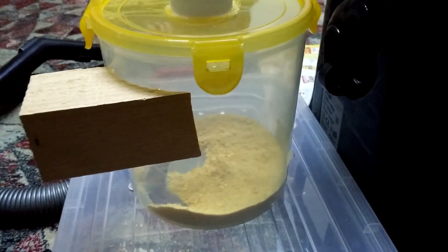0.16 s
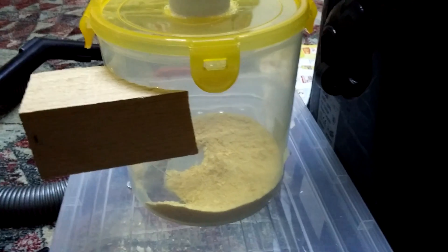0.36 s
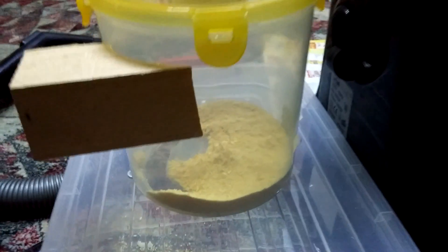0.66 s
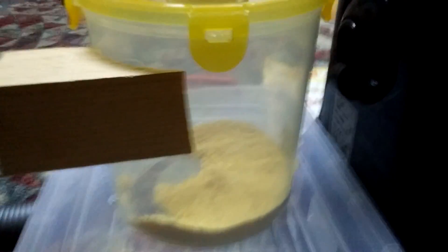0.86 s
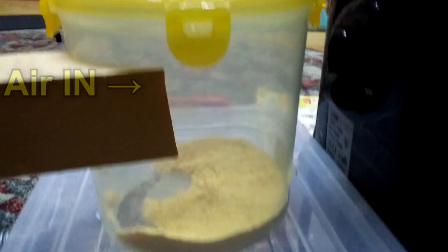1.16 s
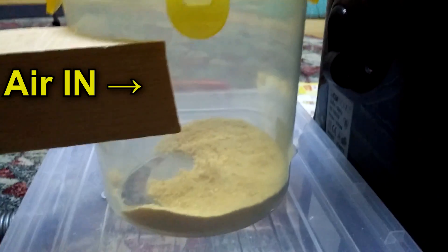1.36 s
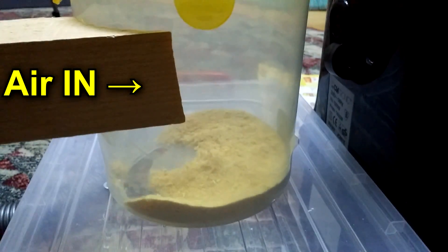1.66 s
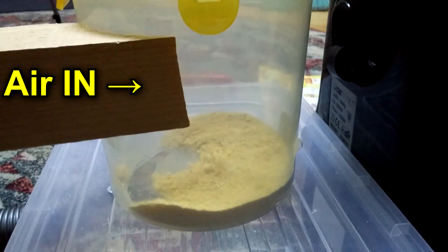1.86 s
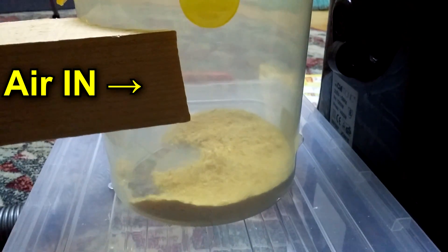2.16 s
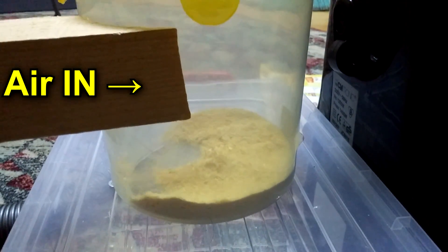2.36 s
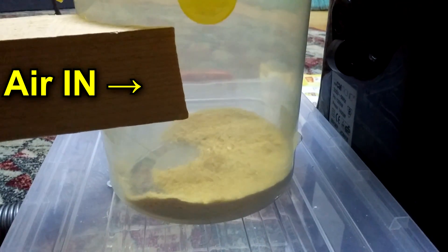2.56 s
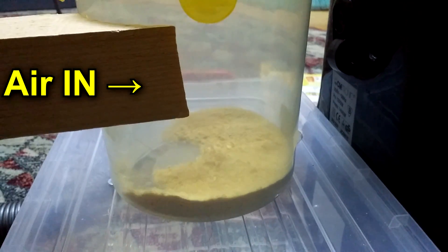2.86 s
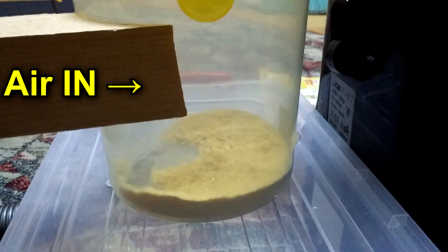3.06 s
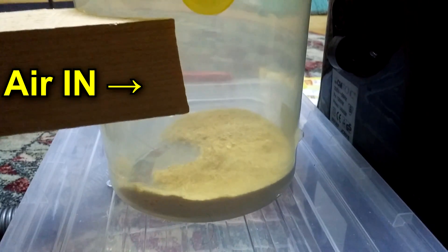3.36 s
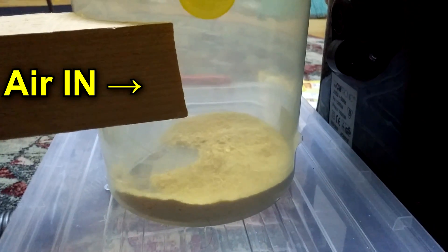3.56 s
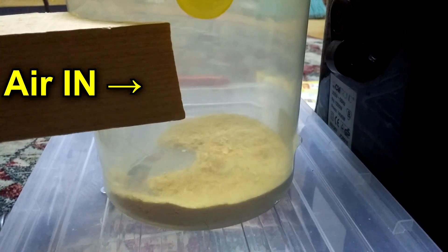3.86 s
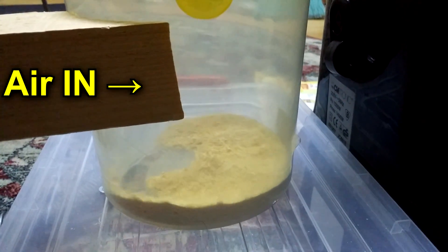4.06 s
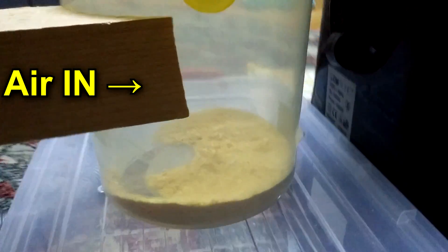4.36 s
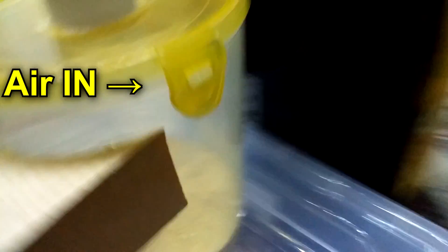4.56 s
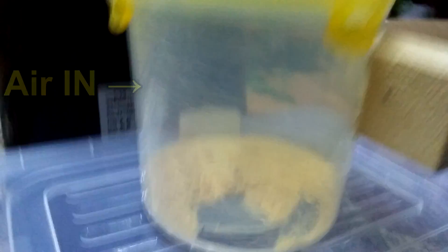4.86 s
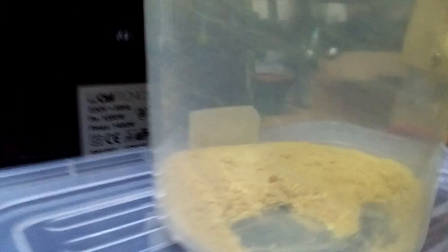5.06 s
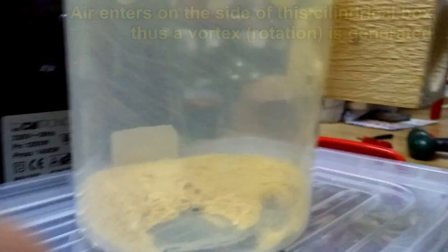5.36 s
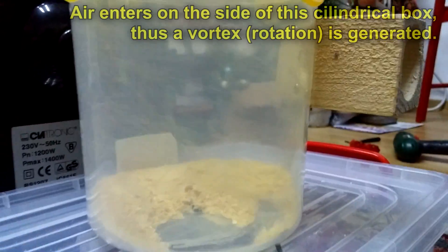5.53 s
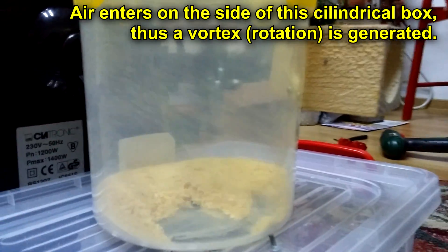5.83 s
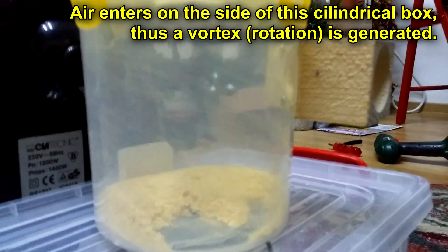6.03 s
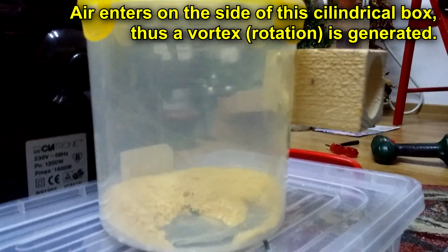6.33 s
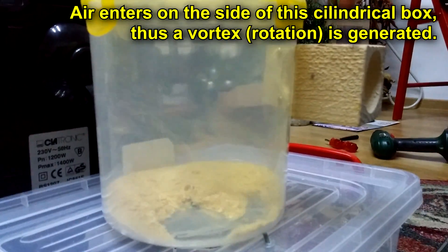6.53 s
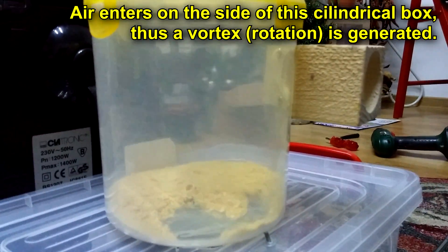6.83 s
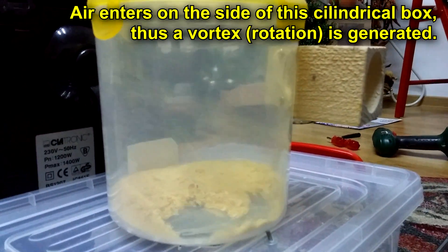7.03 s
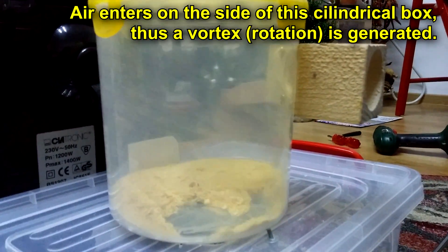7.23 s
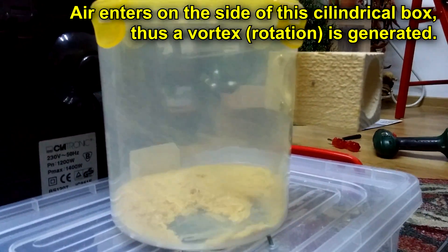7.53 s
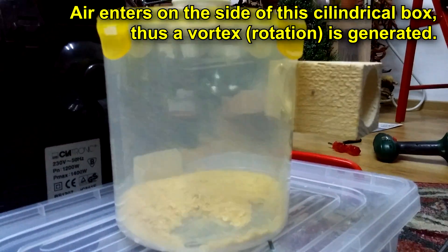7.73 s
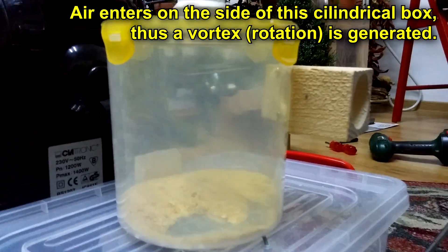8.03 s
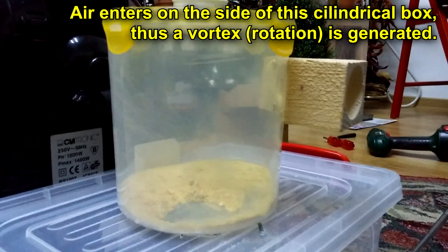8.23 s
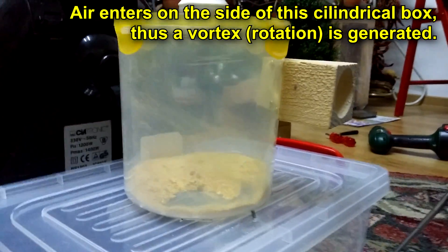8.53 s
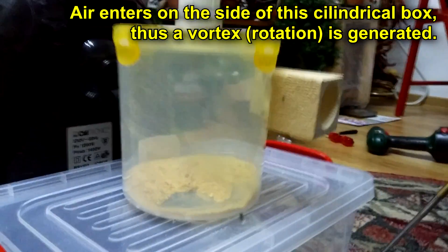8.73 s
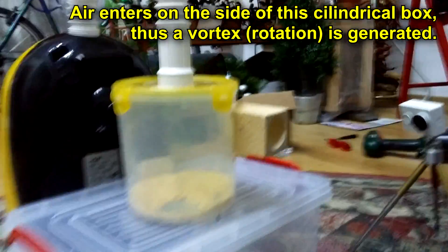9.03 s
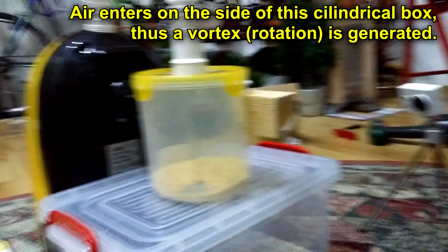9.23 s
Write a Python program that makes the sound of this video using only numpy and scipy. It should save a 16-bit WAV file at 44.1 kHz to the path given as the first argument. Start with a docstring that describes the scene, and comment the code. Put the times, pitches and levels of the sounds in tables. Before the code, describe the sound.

A rough mains buzz with two small chip ticks starts a vacuum cleaner motor, whose whine climbs quickly while air rushes loudly into a plastic jar. The close handheld microphone hears bright, hissing suction for several seconds, then swings round behind the jar with a soft bump. The rush falls away, leaving duller exhaust, motor drone and a thin whine, getting quieter towards the end.

```python
"""A rough mains buzz and two ticks of wood chips lead into a vacuum cleaner spinning up on a plastic cyclone jar.
One shaft drives the sine tones: drone, nine-blade fan whine and ball-bearing song, beside a mains hum.
Filtered noise makes the inlet rush, exhaust, brush sparks and the hiss of a leaking lid.
A hand-held camera starts beside the hissing inlet, then moves round behind the jar, where the duller
exhaust and the motor tones are left; the hand bumps and rubs its body."""
import sys
import numpy as np
from scipy import signal
from scipy.fft import rfft, irfft
from scipy.io import wavfile
from scipy.ndimage import uniform_filter1d, minimum_filter1d, map_coordinates

SR = 44100
rng = np.random.default_rng(int(sys.argv[2]) if len(sys.argv) > 2 else 0)


def generate_wav(sig):
    """Save sig (samples, or channels by samples) to the path in sys.argv[1] as 16-bit PCM at SR."""
    pcm = np.round(np.clip(np.atleast_2d(sig).T, -1, 1) * 32767).astype(np.int16)
    wavfile.write(sys.argv[1], SR, pcm)


N = 414099
TIME = np.arange(N) / SR
FREQ = np.arange(N // 2 + 1) * SR / N
HUM_HZ = 100.05  # magnetic pull peaks twice in each mains cycle

# The camera's path. Each row: time in seconds, place from 0 (in front of the inlet) to 1 (behind the jar),
# level change with distance in dB.
CAMERA = [(0, 0.25, 0.5), (4.6, 0.24, 1.5), (5.1, 0.83, 3), (6.15, 1, 1.1), (6.9, 0.87, 0), (7.5, 0.87, -2),
          (8.87, 0.77, -3.5), (8.94, 0.84, -6.5), (9.38, 0.74, -7)]
# Room modes and nulls that the rising tones sweep through. Each row: centre in Hz, half width in Hz,
# left and right boost in dB.
ROOM = [(114, 15, -9, -13), (158, 4, -3, -5), (169, 37, 3, 7), (187, 5, 0, 0), (207, 4, -5, -3),
        (227, 12, 3, 7), (242, 5.4, -6.5, -6), (260, 3.5, -16.5, -9), (274.4, 4.5, -12, 0.5),
        (505, 15, -8, -10), (565, 29, 3, 3.5), (775, 26, 7.5, 6), (864, 8.9, 6.5, 6), (1930, 10, -5, -10),
        (2150, 22, -5, 1), (2175, 6.7, -18, -19), (2385, 6.4, 2, -8)]


def amp(db):
    """Logarithmic level: 20 dB is a tenfold amplitude."""
    return 10 ** (np.asarray(db) / 20)


def curve(table):
    """Linear interpolation: the columns of a table of times, joined by straight lines."""
    s, *columns = np.transpose(table)
    return np.array([np.interp(TIME, s, c) for c in columns])


def humps(x, table):
    """Resonance: left and right dB of bell-shaped peaks and nulls along pitch or time."""
    return sum(np.outer(heights, np.exp(-((x - centre) / width) ** 2)) for centre, width, *heights in table)


def swells(table):
    """Gaussian envelopes: smooth rises and falls, each with its time, level and half width."""
    return sum(amp(db) * np.exp(-((TIME - s) / width) ** 2) for s, db, width in table)


def bursts(table, rise_s):
    """Exponential decay: quick starts that die away."""
    envelope = 0
    for s, db, decay in table:
        rise = np.clip((TIME - s) / rise_s + .5, 0, 1)
        envelope = envelope + amp(db) * rise * np.exp(-np.abs(TIME - s) / decay)
    return envelope


def walk(rate):
    """Slow random fluctuation: levels held 1 / rate s, smoothed twice, of unit deviation."""
    k = int(SR / rate)
    held = np.repeat(rng.standard_normal(N // k + 1), k)
    slow = uniform_filter1d(uniform_filter1d(held, k), k)[:N]
    return slow / slow.std()


def band(x, low_hz, high_hz):
    """Gentle band-pass filtering."""
    return signal.sosfilt(signal.butter(2, [low_hz, high_hz], "band", fs=SR, output="sos"), x)


def spectrum(table, peaks=()):
    """Spectral density: left and right gains that give white noise a spectrum with resonances on it."""
    hz, *sides = np.transpose(table)
    db = np.array([np.interp(np.log(FREQ + 1), np.log(hz), side) for side in sides])
    db = db + humps(FREQ, peaks)
    low_cut = FREQ / np.hypot(FREQ, 30)
    return amp(db) * np.sqrt(SR / 2) * low_cut


def ports(source, gains, lag_ms, alike_hz):
    """Spatial coherence: two microphones share a delayed noise in the bass, diffuse above alike_hz."""
    direct = 1 / (1 + (FREQ / alike_hz) ** 2)
    delay = np.exp(-1j * np.pi * np.outer([1, -1], FREQ) * lag_ms / 1000)  # half the lag on each side
    diffuse = rfft(rng.standard_normal((2, N)))
    return irfft(gains * (np.sqrt(direct) * delay * rfft(source) + np.sqrt(1 - direct) * diffuse), N)


def shaft_speed():
    """Exponential approach: turns per second near the top after a quick kick and slow climb, then sag."""
    top_hz, sag_hz_per_s = 297.5, .65
    kick_hz, kick_s, climb_hz, climb_s = 38.8, .1563, 146.25, .8245
    return top_hz - kick_hz * np.exp(-TIME / kick_s) - climb_hz * np.exp(-TIME / climb_s) - sag_hz_per_s * TIME


def spin(speed, power):
    """Unbalance: rotating parts shake harder the faster they turn."""
    return (speed / speed.max()) ** power


def inrush():
    """Starting current: it holds, then dies away as the motor gathers speed."""
    start_db, hold_s, fall_db_per_s = -1.5, 0.31, 23
    return amp(start_db - fall_db_per_s * np.maximum(TIME - hold_s, 0))


def brushes(depth, lopsided, regular):
    """Amplitude modulation: the starting current sparks and rattles on each mains half wave, unequally."""
    # Density of the sparks. Each row: frequency in Hz, relative left and right density in dB.
    spark_density = [(59.7, -40, -66), (302, -72, -71), (800, -53.5, -52.5), (1490, -55.5, -60),
                     (2090, -49, -79.5), (3200, -58.5, -65), (4230, -66.5, -66), (7000, -90, -73),
                     (11900, -79, -79), (15600, -91, -90)]
    rattle = np.resize(rng.standard_normal(round(SR / HUM_HZ)), N)  # one half wave, repeated
    source = np.sqrt(regular) * rattle + np.sqrt(1 - regular) * rng.standard_normal(N)
    sparks = band(ports(source, spectrum(spark_density), lag_ms=0.17, alike_hz=3480), 220, 18000)
    mains = np.pi * HUM_HZ * TIME
    return sparks * (1 + depth * np.cos(2 * mains) + lopsided * np.cos(mains)) * inrush()


def motor(turns, speed, front_lag_ms, behind_lag_ms, waver_db, unbalance):
    """Forced vibration: shaft and magnetic pull give harmonics and sum tones, lagging between microphones."""
    # Unbalanced shaft along the path. Each row: time in seconds, left and right level in dB before the room.
    drone_path = [(1.2, -22.5, -26.5), (2.3, -26.5, -23), (2.8, -36.5, -29), (3.45, -25, -23),
                  (4.8, -24.5, -25), (5.2, -19, -20), (6.1, -21, -24.5), (7.1, -21, -24.5),
                  (7.7, -23.5, -30.5), (8.82, -27, -35.5), (9.03, -42, -37), (9.38, -36.5, -29.5)]
    # Magnetic hum. Each row: time in seconds, mean left and right level in dB.
    hum_path = [(0, -24.5, -28), (.6, -30.5, -33.5), (5.2, -32.5, -33.5), (6.3, -42, -40.5),
                (9.38, -48, -48.5)]
    # Third shaft order, ringing in the housing. Each row: time in seconds, relative left and right dB.
    third_order = [(1.4, -39, -37.5), (2.3, -37.5, -36), (3.5, -36, -34), (4.7, -42, -41),
                   (5.25, -31.5, -29.5), (6, -53, -52), (6.5, -47, -40.5), (7.9, -39.5, -38.5),
                   (8.15, -34.5, -32.5), (8.85, -31.5, -30.5), (9.15, -50, -36)]
    # Second shaft order along the path. Each row: time in seconds, relative level in dB.
    second_order = [(1.3, -40), (4.5, -43), (5.2, -51), (6.2, -53), (8.4, -53), (8.9, -49.5), (9.38, -47)]
    # Core buzz under the starting current. Each row: multiple of the hum, relative level in dB.
    core_buzz = [(2, -43), (3, -39.5), (4, -44), (8, -43), (12, -44)]
    # Sum tones. Each row: shaft multiple, hum multiple, relative dB in front, relative dB behind.
    motor_lines = [(0, 2, -36, -40.5), (0, 4, -56.5, -52.5), (0, 12, -43, -58), (1, 1, -40.5, -69),
                   (2, 1, -51.5, -53), (2, 2, -43, -62.5), (3, 1, -51, -50), (4, 0, -36, -59),
                   (8, 0, -60, -57)]

    behind, distance_db = curve(CAMERA)
    lag_ms = front_lag_ms + behind * (behind_lag_ms - front_lag_ms)
    lag = np.outer([-1, 1], lag_ms) / 2000  # seconds, half on each side
    shaft = 2 * np.pi * (turns + speed * lag)
    mains = 2 * np.pi * HUM_HZ * (TIME + lag)
    shake = spin(speed, unbalance)

    out = amp(curve(drone_path) + humps(speed, ROOM) + 0.83 * walk(15)) * np.sin(shaft)
    out += amp(curve(hum_path) + 0.4 * walk(25)) * np.sin(mains)
    out += amp(curve(third_order) + humps(3 * speed, ROOM) + 1.3 * walk(70)) * shake * np.sin(3 * shaft)
    out += amp(curve(second_order) + humps(2 * speed, ROOM) + 1.6 * walk(35)) * shake * np.sin(2 * shaft)
    out += inrush() * sum(amp(db + 2 * walk(8.9)) * np.sin(order * mains) for order, db in core_buzz)
    for shaft_order, hum_order, front_db, behind_db in motor_lines:
        gain = amp(distance_db + front_db + behind * (behind_db - front_db))
        if shaft_order:  # rotating parts rattle, the hum is steady
            hz = shaft_order * speed + hum_order * HUM_HZ
            gain = gain * amp(waver_db * walk(35) + humps(hz, ROOM)) * shake
        out += gain * np.sin(shaft_order * shaft + hum_order * mains)
    return np.sqrt(2) * out


def exhaust(gust_db):
    """Turbulence noise: duller air leaves through the filter; distance and the jar shade its treble more."""
    # Density of the exhaust air. Each row: frequency in Hz, relative left and right density in dB.
    exhaust_density = [(35, -78, -82), (100, -79, -78), (198, -61, -63), (587, -72, -77.5),
                       (906, -66.5, -67), (1370, -72.5, -73.5), (2640, -84, -67), (3150, -85, -86.5),
                       (4040, -89, -81.5), (6100, -80.5, -85.5), (7200, -94, -86.5), (10500, -93, -87.5),
                       (12500, -91, -102), (15500, -97, -112)]
    # Resonances. Each row: centre in Hz, half width in Hz, left and right boost in dB.
    exhaust_peaks = [(1110, 65, -6, -1.5), (1420, 75, -2.5, -4), (1790, 130, 0, 1.5), (2312, 69, -10, 9),
                     (4200, 330, 5, 1.5), (5960, 300, 0.5, 0.5), (9300, 850, 1, 5.5), (14600, 350, 6, 7)]
    behind, distance_db = curve(CAMERA)
    body_db = 2.5 + distance_db
    treble_db = 10 + 1.2 * distance_db - 9.5 * behind
    gains = spectrum(exhaust_density, exhaust_peaks)
    treble = 1 / (1 + (3000 / (FREQ + 1)) ** 8)  # power share above 3 kHz
    body = ports(rng.standard_normal(N), gains * np.sqrt(1 - treble), lag_ms=-0.19, alike_hz=1500)
    hiss = ports(rng.standard_normal(N), gains * np.sqrt(treble), lag_ms=-0.15, alike_hz=1200)
    return body * amp(body_db + gust_db * walk(14)) + hiss * amp(treble_db + 0.99 * walk(11))


def past_jar(gains):
    """Interchannel phase: the jar's crosswise modes turn the rush between two microphones."""
    # Each row: frequency in Hz, left lead in radians, share in common from 0 to 1.
    rush_path = [(35, 0, 1), (500, -0.7, 0.9), (1000, -1.2, .85), (1440, -1.74, 0.75), (2000, -3.5, 1),
                 (2220, -3, 0.53), (2580, 2, 0.4), (3030, 0, 0.78), (3420, 0, 0.65), (3920, -2, 0.14),
                 (4350, -2.5, 0.43), (5250, -5, 0.8), (7400, -5, 0), (8830, -3.4, 0), (8980, -6, 0.95),
                 (9770, -3.5, 0.13), (15500, -0.5, 0)]
    hz, *columns = np.transpose(rush_path)
    lead, common = (np.interp(FREQ, hz, c) for c in columns)
    direct = np.exp(.5j * np.outer([1, -1], lead)) * rfft(rng.standard_normal(N))
    diffuse = rfft(rng.standard_normal((2, N)))
    return irfft(gains * (np.sqrt(common) * direct + np.sqrt(1 - common) * diffuse), N)


def rush_level(speed):
    """Flow-noise power law: the rush grows with shaft speed until the inlet chokes; the jar shades it."""
    # Shadow of the jar. Each row: time in seconds, level change in dB.
    jar_shadow = [(4.3, -1), (4.36, -5.5), (4.56, -5.5), (4.63, -8), (4.86, -12.5), (5.08, -24.5),
                  (5.5, -29), (5.72, -39), (5.87, -26), (6.0, -43), (6.2, -45), (7.7, -41.5), (8.7, -33),
                  (9.38, -40)]
    choke_hz, power, full_db, idle_db = 253.8, 6.36, -0.17, -20
    flow = np.hypot(amp(idle_db), amp(full_db) * np.minimum(speed / choke_hz, 1) ** power)
    return flow * amp(curve(jar_shadow))


def slide(pair, place):
    """Resampling: reading a sound faster or slower slides its pitch."""
    return np.array([map_coordinates(side, [place], order=5, mode="mirror") for side in pair])


def inlet(turns, speed, gust_db, flicker_db, shade_hz, shade):
    """Edge noise and directivity: torn air rings in a forward beam that blurs to broad humps off axis."""
    # Inlet rush. Each row: frequency in Hz, relative left and right density in dB.
    rush_density = [(35, -82, -71), (100, -58, -63), (200, -65, -64.5), (493, -68, -60),
                    (814, -56.5, -58.5), (1650, -53.5, -54), (2080, -54, -54.5), (2190, -53.5, -64),
                    (3280, -56.5, -58), (4500, -60.5, -59.5), (8100, -58, -54), (12560, -64.5, -62),
                    (13750, -69, -72.5), (15500, -70, -69)]
    # The next three have in each row: centre in Hz, half width in Hz, left and right boost in dB.
    # Resonances and gaps of the hose and jar, which colour the whole rush.
    hose_modes = [(500, 70, -6, 0), (1000, 73, -12, -5.5), (1436, 140, -8.5, -7.5), (1600, 150, 2, 1.5),
                  (3040, 250, -2.5, -1), (4110, 300, 4, 3.5)]
    # Whistling resonances of the inlet.
    inlet_peaks = [(5030, 340, 4.5, 5), (5720, 154, 5.5, 4), (6590, 260, 0, 5.5), (8755, 290, 3, 8),
                   (9270, 407, 2.5, 17.5), (10290, 460, -1, 11.5), (11250, 210, 6, 9)]
    # Broad humps heard off axis.
    off_axis = [(5400, 800, 5.5, 6.5), (9600, 860, -1, 7.5), (15000, 2000, 6, 7)]
    # Thin tones escaping with the air, each while it lies in a pipe resonance. Each row: shaft multiple,
    # resonance in Hz, half width in Hz, relative left and right level in dB.
    inlet_tones = [(22, 5830, 280, -33, -31), (23, 6760, 97, -43, -41), (24, 6630, 220, -42, -25.5),
                   (26, 7630, 440, -50, -28)]
    # How the inlet faces the microphones. Each row: time in seconds, share aimed at them from 0 to 1,
    # delay of the jar wall's reflection in milliseconds, its strength from 0 to 1.
    inlet_aim = [(0, 0.65, 0.25, 0.17), (1.1, 0.38, 0.22, 0.1), (1.28, 0.3, 0.25, 0.24),
                 (1.34, 0.93, 0.2, 0.06), (4.54, 1, 0.21, 0), (4.62, 0.3, 0.37, 0), (4.74, 0.08, 0.52, 0.3),
                 (4.83, 0.3, 0.414, 0.3), (4.88, 0.35, 0.44, 0.2), (5.05, 0.27, .31, 0),
                 (9.38, 0.02, 0.21, 0.3)]
    # Pitch of the hiss with the angle to the inlet. Each row: time in seconds, shift in percent.
    hiss_shift = [(.4, 1.5), (.95, 3), (1.1, 0), (4.3, 0), (4.5, 1.5), (4.7, -2.5), (5.0, -4), (5.25, 0.5),
                  (5.5, 1), (6, 0)]

    aim, delay_ms, strength = curve(inlet_aim)
    place = np.cumsum(1 + curve(hiss_shift)[0] / 100)
    beamed = slide(past_jar(spectrum(rush_density, hose_modes + inlet_peaks)), place)
    scattered = slide(past_jar(spectrum(rush_density, hose_modes + off_axis)), place)
    air = np.sqrt(aim) * beamed + np.sqrt(1 - aim) * scattered
    for multiple, centre_hz, width_hz, *sides_db in inlet_tones:
        ringing = np.exp(-((multiple * speed - centre_hz) / width_hz) ** 2)
        tone = amp(2 * walk(40.1)) * ringing * np.sin(2 * np.pi * multiple * turns)
        air += np.sqrt(2) * np.outer(amp(sides_db), tone)
    # the wall's reflection combs the hiss, and the comb sweeps as the camera moves
    echo = np.array([np.interp(TIME - delay_ms / 1000, TIME, side) for side in air])
    air = (air + strength * echo) / np.hypot(1, strength)
    # the highest hiss does not bend round the jar
    top = irfft(rfft(air) / (1 + (shade_hz / (FREQ + 1)) ** 16), N)
    air -= shade * curve(CAMERA)[0] ** 2 * top
    return air * rush_level(speed) * amp(gust_db * walk(7.22) + flicker_db * walk(60))


def knocks(body_hz, rustle):
    """Impact sound: chips tick in the jar; the hand bumps the camera, whose body knocks and rustles."""
    # Chips against the jar. Each row: time in seconds, level in dB, decay in seconds.
    chip_ticks = [(.174, -11, 0.0028), (.232, -15, .003), (5.845, -33, .015)]
    # Bumps of the hand. Each row: time in seconds, level in dB, decay in seconds.
    hand_bumps = [(4.742, -15, 0.011), (4.777, -27, .012), (4.825, -31, 0.016), (5.837, -27, .009)]
    tick_rise_s, bump_rise_s = .002, 0.008
    ticks = band(rng.standard_normal((2, N)), 1500, 11600)
    ticks = ticks / ticks.std() * bursts(chip_ticks, tick_rise_s)
    knock = 0
    for bump in hand_bumps:
        knock = knock + bursts([bump], bump_rise_s) * np.sin(2 * np.pi * body_hz * (TIME - bump[0]))
    rub = band(rng.standard_normal(N), 40, 130)
    return ticks - knock + rustle * rub / rub.std() * bursts(hand_bumps, bump_rise_s)


def fan_whine(turns, speed, flutter_db, glide_flutter_db, swing_flutter_db, flutter_hz, buzz):
    """Blade-passing tone: nine blades pass the vanes, fluttering most as pitch glides or camera swings."""
    # Standing-wave field along the path. Each row: time in seconds, left and right level in dB before
    # room and nodes, left lead in radians.
    whine_path = [(.3, -20, -37, 2), (.4, -17, -23, 3), (.55, -19, -26, 4), (.8, -20.5, -27, 3.5),
                  (.92, -16.5, -27, 3.5), (1.0, -12.5, -19, 4), (1.22, -11.5, -20.5, 1.5),
                  (1.5, -14, -25, 0), (1.9, -13.5, -18, 1), (2.15, -19, -20, 0.5), (2.65, -10.5, -15, -0.5),
                  (3.25, -14, -13, 0.15), (4.0, -11.5, -21, 0.45), (4.71, -13.5, -26, 0.5),
                  (4.93, -31, -30, -2.5), (5.38, -30.5, -25, 1), (5.85, -21, -18, 0.7),
                  (6.3, -23.5, -19, 1.5), (7.0, -49, -19, 3), (7.97, -44, -22, 7), (8.3, -41, -29, 9.5),
                  (8.65, -35.5, -62, 10.5), (9.02, -29, -43, 14.5), (9.08, -23, -24, 14),
                  (9.14, -33, -16, 14), (9.25, -39, -27.5, 14.5)]
    # Nodes and loud spots that the camera crosses. Each row: time in seconds, half width in seconds,
    # left and right boost in dB.
    whine_nodes = [(2.9, 0.22, -2.5, -7.5), (4.55, 0.073, -1.5, 8.5), (4.64, 0.025, -1.5, -4),
                   (4.71, 0.04, 1, 6), (4.785, 0.037, -1, -17), (4.86, 0.045, 3, 9.5),
                   (4.93, 0.045, -3, 10), (5.0, .03, 4, 2), (5.15, .04, 6, -2), (7.55, 0.15, 8, -1),
                   (8.42, .05, 0, -1), (8.955, 0.016, -4, 5), (8.992, 0.018, -18, -9)]
    onset_hz, onset_width_hz = 184, 6.4  # shaft speed around which the fan starts to sing
    left_db, right_db, lead = curve(whine_path)
    glide = np.clip(np.gradient(speed) * SR / 14, 0, 1)
    swing = np.clip(np.abs(np.gradient(curve(CAMERA)[0])) * SR, 0, 1)
    depth_db = flutter_db + glide_flutter_db * glide + swing_flutter_db * swing
    flutter = depth_db * np.array([walk(flutter_hz), walk(flutter_hz)])
    blade = 2 * np.pi * 9 * turns
    torque = 1 + buzz * np.sin(2 * np.pi * HUM_HZ * TIME)  # the pull throbs with the mains
    onset = .5 + .5 * np.tanh((speed - onset_hz) / (2 * onset_width_hz))
    level_db = np.array([left_db, right_db]) + humps(9 * speed, ROOM) + humps(TIME, whine_nodes) + flutter
    return np.sqrt(2) * amp(level_db) * onset * torque * np.sin([blade + lead / 2, blade - lead / 2])


def whistle(hz, width_hz, left_db):
    """Narrow directivity: the inlet's strongest resonance flares when its beam catches the microphones."""
    # Each row: time in seconds, level in dB before the left side's cut, half width in seconds.
    beam_flares = [(.65, -18, 0.068), (1.1, -9, 0.023), (5.3, -42, 0.17), (5.52, -38, 0.065),
                   (5.88, -50, .06), (6.53, -42, .04), (8.17, -44.5, .08), (8.62, -44, .05),
                   (9.02, -44, .022)]
    ring = band(rng.standard_normal((2, N)), hz - width_hz / 2, hz + width_hz / 2)
    return ring / ring.std() * swells(beam_flares) * amp([[left_db], [0]])


def housing(hz, width_hz, lump_db, lump_hz):
    """Cavity resonance: exhaust air flutters roughly in the housing, with a few stronger puffs."""
    # Flutter along the path. Each row: time in seconds, mean level in dB.
    flutter_path = [(.7, -39.5), (1.15, -34), (1.5, -38), (5.2, -48), (6.5, -49), (7.8, -45), (8.45, -41.5),
                    (8.85, -44), (9.05, -44)]
    # Stronger puffs. Each row: time in seconds, level in dB, half width in seconds.
    strong_puffs = [(1.09, -29, .02), (7.47, -41, .02), (8.085, -34, .022), (8.82, -38, .025)]
    air = ports(rng.standard_normal(N), 1, lag_ms=-0.17, alike_hz=2500)
    ring = band(air, hz - width_hz / 2, hz + width_hz / 2)
    return ring / ring.std() * (amp(curve(flutter_path) + lump_db * walk(lump_hz)) + swells(strong_puffs))


def bearing(turns, speed, waver_db, waver_hz):
    """Ball-pass frequency: rolling balls sing between the shaft orders once nearly up to speed."""
    # Each row: multiple of the ball-pass rate, relative dB in front, relative dB behind,
    # left lead in radians.
    bearing_tones = [(3, -33.5, -56, 0.84), (5, -32, -57, 2.4)]
    ball_passes_per_turn = 1.47
    onset_hz, onset_width_hz = 258, 13
    behind, distance_db = curve(CAMERA)
    onset = .5 + .5 * np.tanh((speed - onset_hz) / onset_width_hz)
    out = 0
    for order, front_db, behind_db, lead in bearing_tones:
        gain = amp(distance_db + front_db + behind * (behind_db - front_db) + waver_db * walk(waver_hz))
        phase = 2 * np.pi * order * ball_passes_per_turn * turns
        out = out + gain * np.sin([phase + lead / 2, phase - lead / 2])
    return np.sqrt(2) * onset * out


def leak(waver_db):
    """Jet noise: a broad, thin hiss from the rim of the lid, mostly on the left."""
    # Density of the hiss. Each row: frequency in Hz, relative left and right density in dB.
    leak_density = [(2500, -110, -115), (5000, -84, -98), (6500, -78, -86), (8000, -79, -94),
                    (9300, -79, -90), (10400, -83, -95), (11800, -74, -95), (13400, -84, -104),
                    (15500, -81, -106)]
    # Nearness of the microphones to the leak. Each row: time in seconds, level change in dB.
    leak_nearness = [(4.5, -20), (4.72, 7), (4.95, 1), (5.5, 2), (5.9, 3), (6.2, -12), (6.5, -12),
                     (7.4, -6.5), (7.8, -6.5), (7.95, -12), (8.6, -14), (9.0, -21)]
    hiss = irfft(spectrum(leak_density) * rfft(rng.standard_normal((2, N))), N)
    return hiss * amp(curve(leak_nearness) + waver_db * walk(15))


def handling(low_hz):
    """Friction noise: the hand shifts on the camera and its body rumbles."""
    # Each row: time in seconds, level in dB, half width in seconds, upper edge in Hz.
    hand_rubs = [(4.785, -37.5, 0.09, 130), (5.96, -36, 0.064, 430)]
    out = 0
    for *swell, high_hz in hand_rubs:
        rub = band(rng.standard_normal(N), low_hz, high_hz)
        out = out + rub / rub.std() * swells([swell])
    return out


def scene():
    """Superposition: one shaft drives every rotating tone; the air noise lies around them."""
    speed = shaft_speed()
    turns = np.cumsum(speed * (1 + 0.000298 * walk(12))) / SR
    tones = motor(turns, speed, front_lag_ms=0.24, behind_lag_ms=-0.26, waver_db=4.0, unbalance=2.6)
    tones += fan_whine(turns, speed, flutter_db=0.3, glide_flutter_db=1.73, swing_flutter_db=1.5,
                       flutter_hz=47.77, buzz=0.052)
    tones += bearing(turns, speed, waver_db=3.0, waver_hz=34.95)
    air = exhaust(gust_db=1.9)
    air += inlet(turns, speed, gust_db=0.57, flicker_db=0.76, shade_hz=11800, shade=0.55)
    air += whistle(hz=9150, width_hz=980, left_db=-13)
    air += housing(hz=909, width_hz=120, lump_db=4.0, lump_hz=24)
    air += leak(waver_db=1.0)
    sparks = brushes(depth=0.19, lopsided=0.33, regular=0.18)
    return tones + air + sparks + knocks(body_hz=120, rustle=0.69) + handling(low_hz=50)


def limiter(x, ceiling, size):
    """Peak limiting: it looks ahead and eases the gain down around each peak."""
    gain = np.minimum(1, ceiling / (np.abs(x) + 1e-9))
    return x * uniform_filter1d(minimum_filter1d(gain, size), size)


def record(dry):
    """Gain and low-pass: the level dips briefly three times, peaks are held and the top is cut."""
    # Each row: time in seconds, depth in dB, half width in seconds.
    level_dips = [(4.343, -12.5, 0.0045), (5.836, -13, 0.0028), (8.925, -11, .004)]
    top_hz = 15700
    dip_db = sum(db * np.exp(-((TIME - s) / width) ** 2) for s, db, width in level_dips)
    held = limiter(dry * amp(dip_db), ceiling=0.88, size=45)
    return signal.sosfilt(signal.ellip(14, .1, 80, top_hz, fs=SR, output="sos"), held)


dry = scene()
out = record(dry)
generate_wav(out)
```